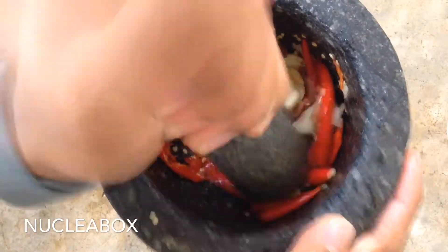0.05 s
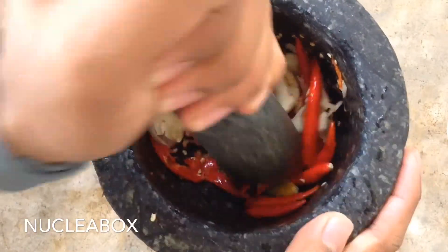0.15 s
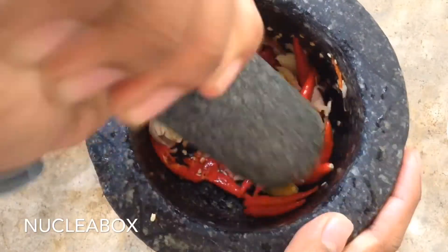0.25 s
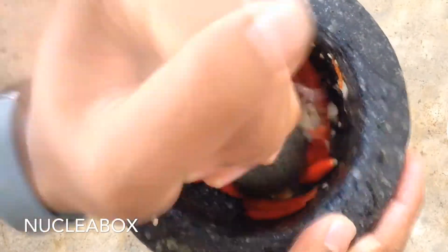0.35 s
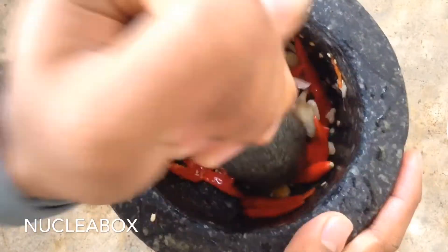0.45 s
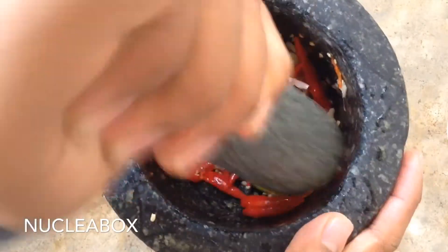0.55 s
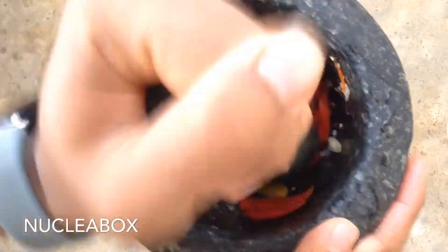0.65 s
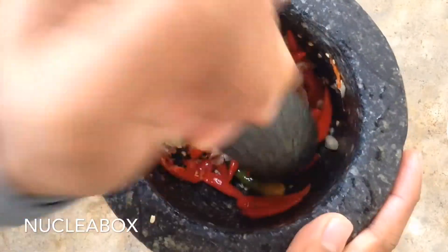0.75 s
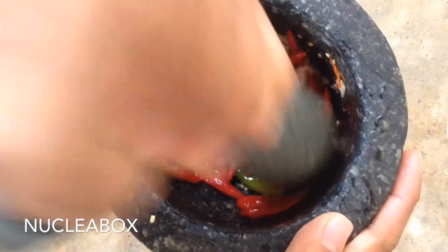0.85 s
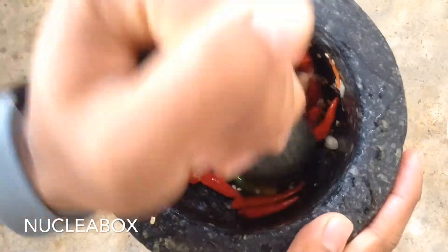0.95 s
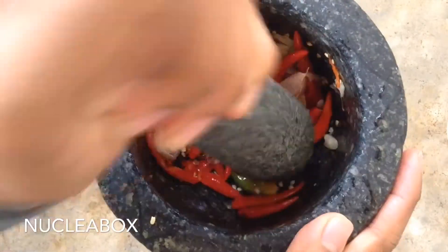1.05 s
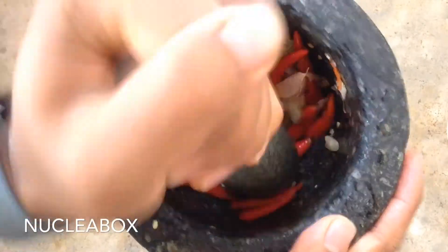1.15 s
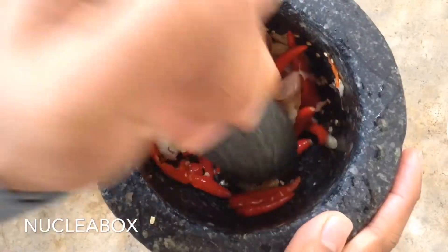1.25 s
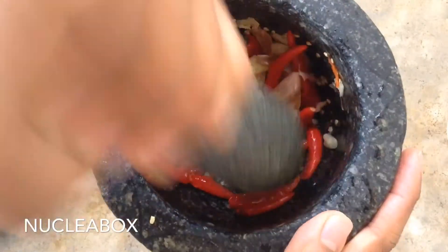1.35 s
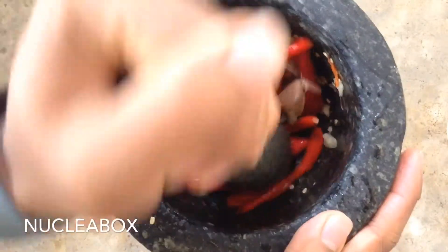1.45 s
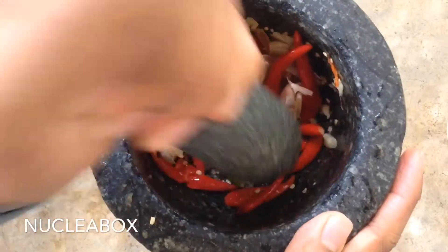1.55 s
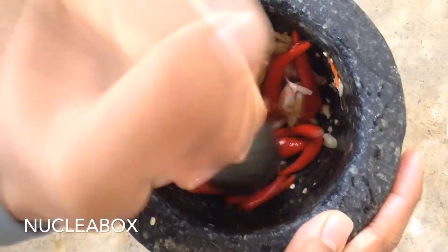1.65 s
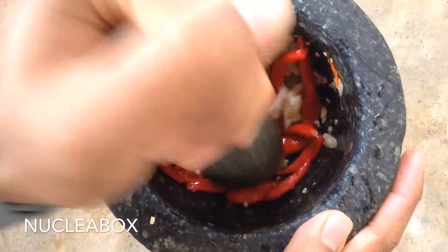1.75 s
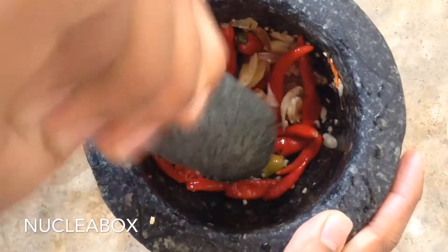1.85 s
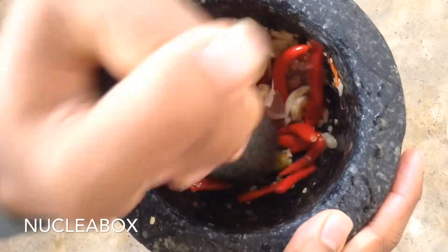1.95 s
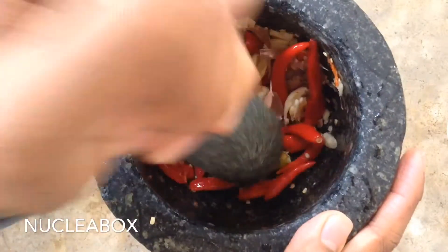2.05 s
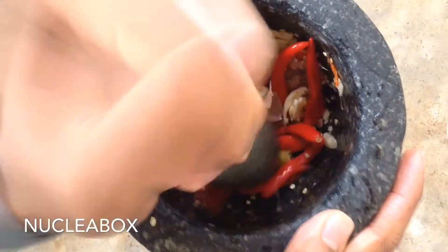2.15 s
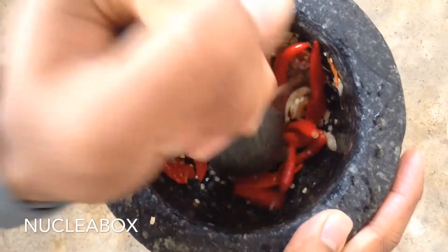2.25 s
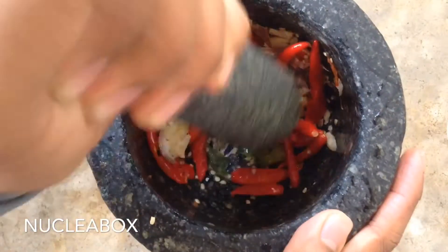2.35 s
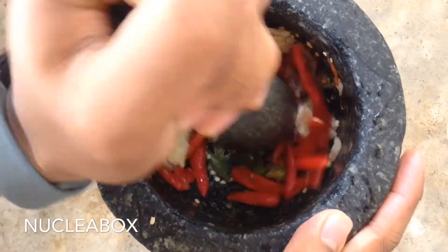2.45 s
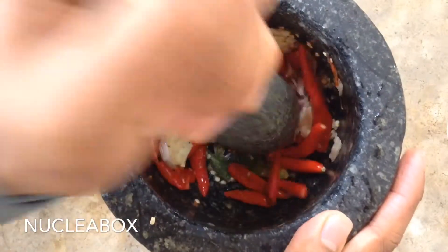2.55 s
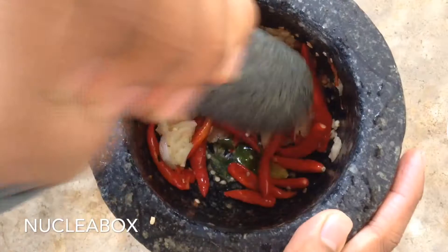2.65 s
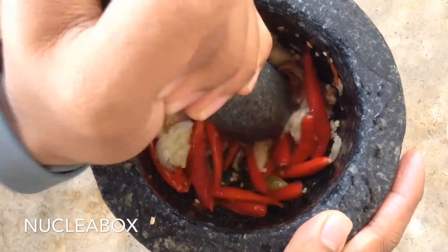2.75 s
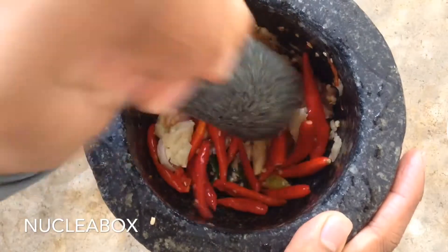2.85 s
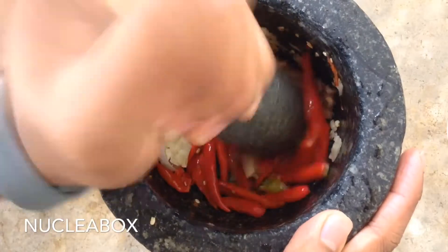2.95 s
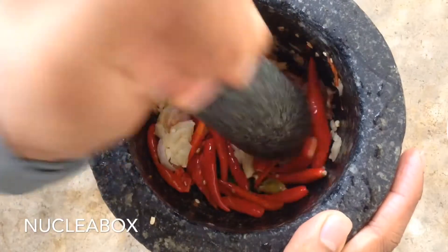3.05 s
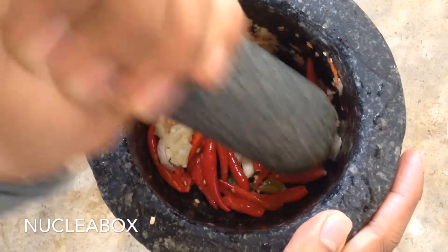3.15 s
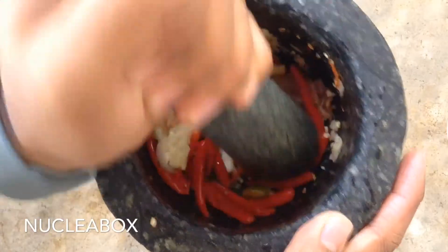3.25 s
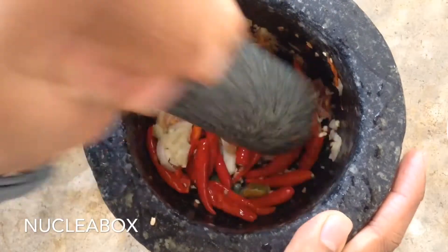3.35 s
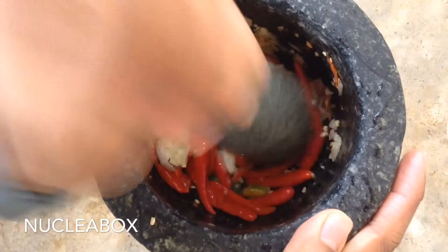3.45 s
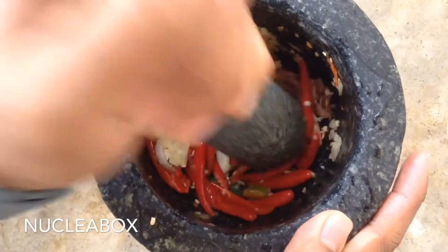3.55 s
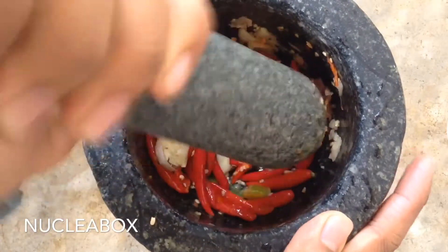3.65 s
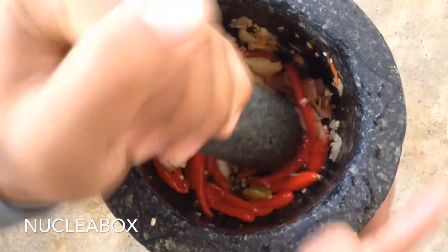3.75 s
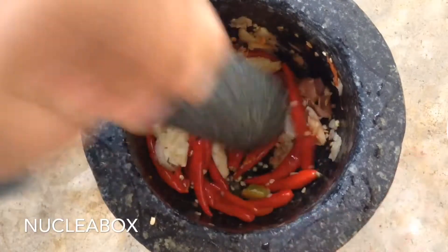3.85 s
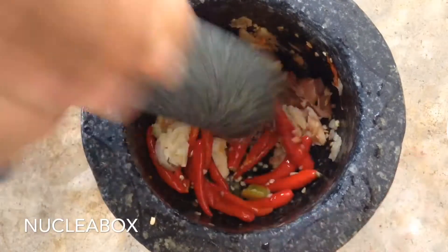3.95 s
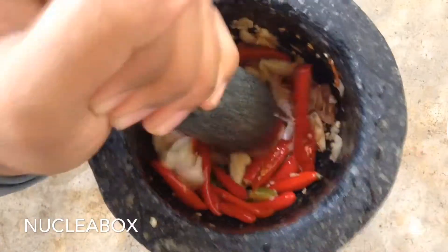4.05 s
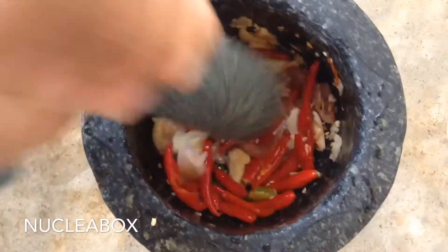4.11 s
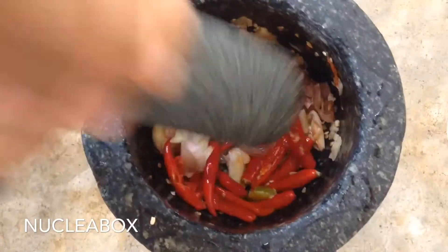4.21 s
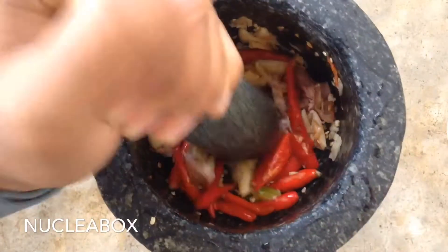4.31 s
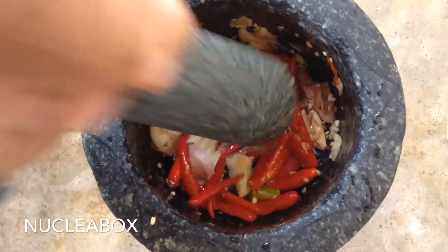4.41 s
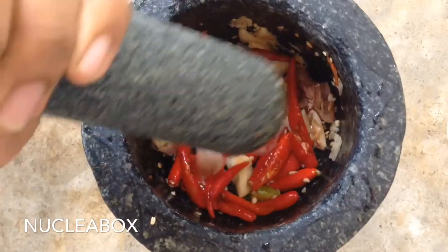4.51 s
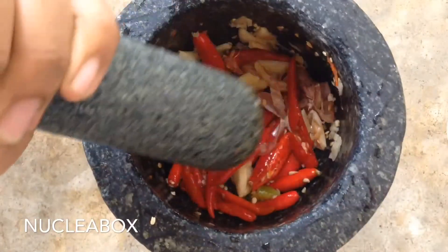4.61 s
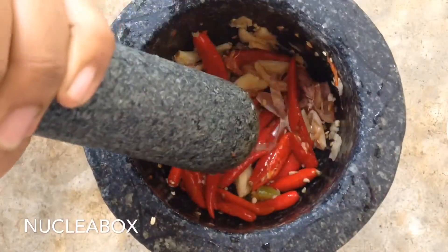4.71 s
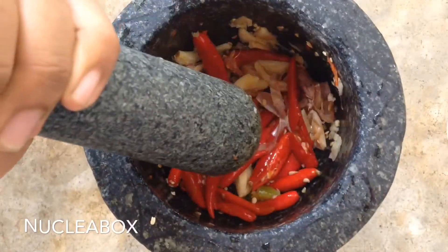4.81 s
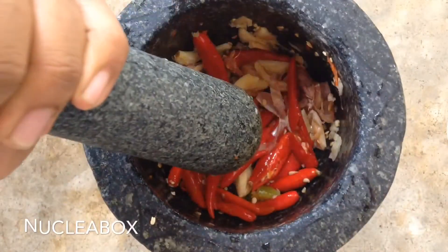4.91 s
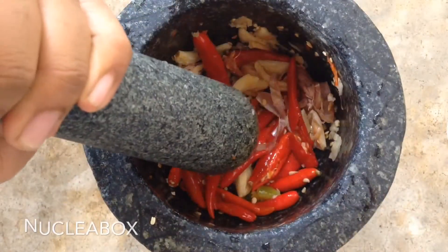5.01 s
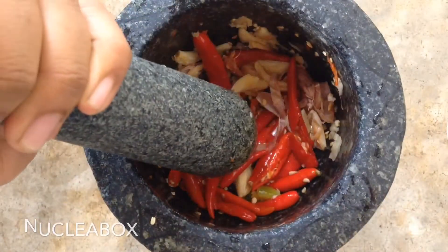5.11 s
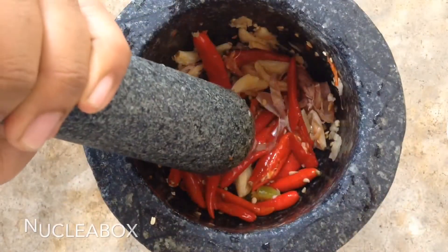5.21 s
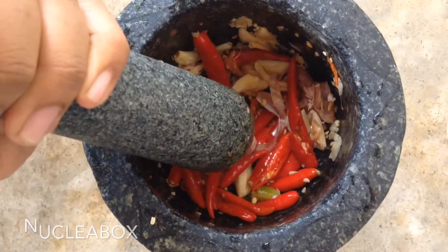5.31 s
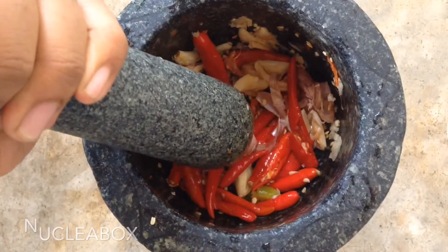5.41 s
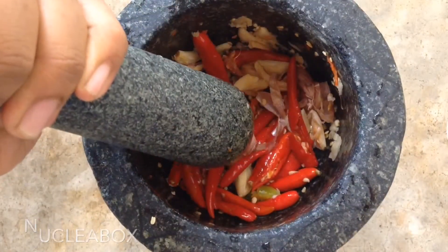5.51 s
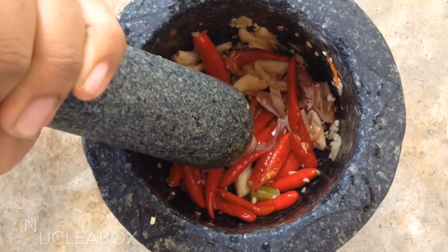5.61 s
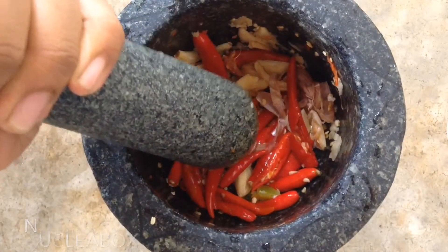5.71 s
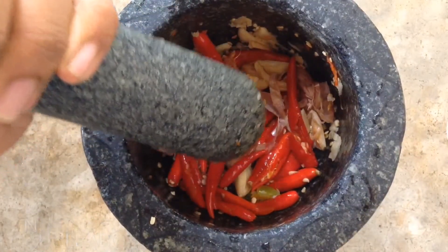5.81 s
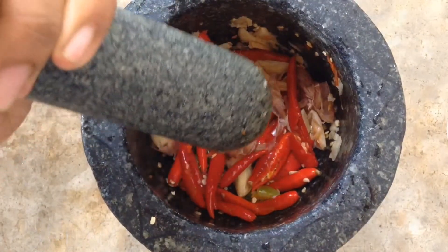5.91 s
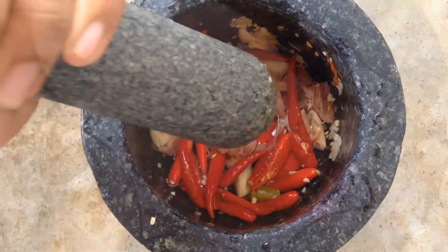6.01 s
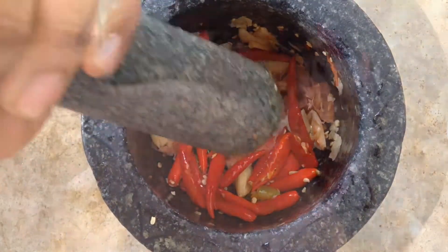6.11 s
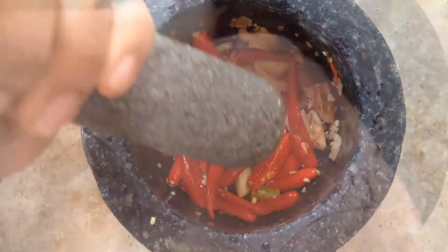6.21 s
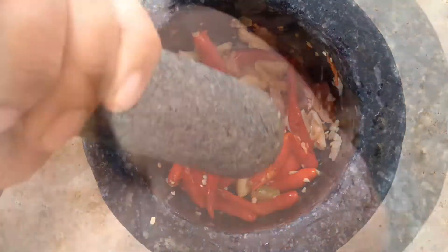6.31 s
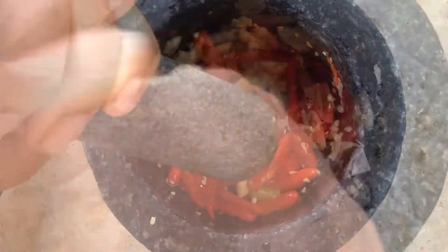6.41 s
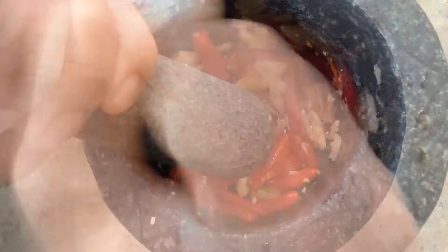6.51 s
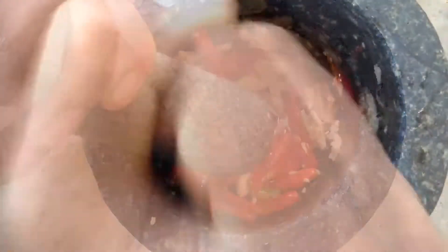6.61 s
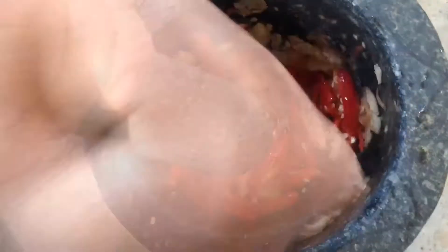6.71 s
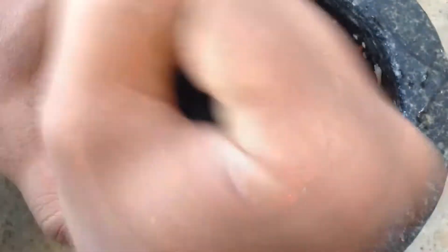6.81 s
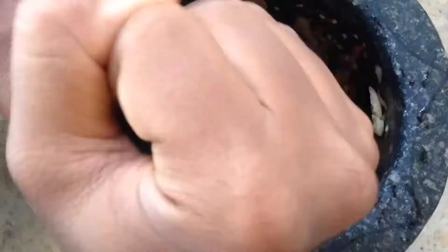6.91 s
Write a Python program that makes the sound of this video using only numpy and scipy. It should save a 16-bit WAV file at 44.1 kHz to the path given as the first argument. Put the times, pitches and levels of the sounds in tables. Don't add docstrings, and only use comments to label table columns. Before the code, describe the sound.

Close, quick stone pounding with crisp bursting skins, low floor thumps and a few bare stone clanks stops abruptly, leaving quiet distant rumble.

```python
import sys
import numpy as np
from scipy import signal
from scipy.fft import rfft, irfft
from scipy.io import wavfile
from scipy.ndimage import uniform_filter1d

SR = 44100
rng = np.random.default_rng(int(sys.argv[2]) if len(sys.argv) > 2 else 0)


def unload_wav(signal):
    wavfile.write(
        sys.argv[1],
        SR,
        np.round(np.clip(np.atleast_2d(signal).T, -1, 1) * 32767).astype(np.int16),
    )


def invert_db(x):
    u = np.asarray(x, float) / 20
    return 10 ** u


N = 307192
SPAN = 4096
BINS = np.fft.rfftfreq(SPAN, 1 / SR) + 1
PRE = 200


def evened(x):
    return x / np.sqrt(np.mean(x ** 2) + 1e-20)


def read(points, hz):
    f, value = np.transpose(points)
    return np.interp(np.log(hz + 1), np.log(f + 1), value)


def add(mix, s, sound):
    part = mix[..., round(s * SR):][..., :sound.shape[-1]]
    part += sound[..., :part.shape[-1]]


def ring(hz, db, t60, phase, rise=0.0022, size=16000):
    pole = np.atleast_1d(2j * np.pi * hz - np.log(1000) / t60)[:, None] / SR
    turn = 2j * np.pi * np.reshape(phase, (-1, 1))
    coarse = invert_db(np.atleast_1d(db))[:, None] * np.exp(pole * np.arange(0, size, 50) + turn)
    fine = np.exp(pole * np.arange(50))
    modes = (coarse.T @ fine).imag.ravel()
    return modes * (1 - np.exp(-np.arange(size) / SR / rise)) ** 2


def click(colour_db, like):
    pulse = np.fft.fftshift(irfft(invert_db(colour_db)))[SPAN // 2 - PRE:]
    return pulse * np.linalg.norm(like) / np.linalg.norm(pulse)


def flutter(size, width, depth):
    wobble = rng.standard_normal(size)
    for _ in range(2):
        wobble = uniform_filter1d(wobble, width)
    return (1 + depth * evened(wobble)) / np.sqrt(1 + depth ** 2)


# (time [s], level [dB])
PASSING = [
    (0, -52.5),
    (1, -60),
    (3.5, -57),
    (4.6, -62),
    (5.201, -59),
    (5.8, -56),
    (6.15, -57.5),
    (6.97, -57),
]


def passing_db(t):
    s, db = np.transpose(PASSING)
    return np.interp(t, s, db)


# (frequency [Hz], density [dB per Hz])
AIR = [(18, -90), (30, -59), (75, -37), (103, -17), (189, -2), (415, -17), (554, -16.5), (702, -17),
       (866, -11.5), (1460, -19.5), (1720, -22), (2540, -22.5), (4780, -38.5), (14800, -48.5), (16000, -66)]


def traffic():
    frames, hz = N // 256 + 5, np.fft.rfftfreq(1024, 1 / SR)
    a, b, patches = rng.standard_normal((3, len(hz), frames))
    patches = uniform_filter1d(patches, size=6, axis=0)
    patches = evened(uniform_filter1d(patches, size=14, axis=1))
    z = (a + 1j * b) * invert_db(read(AIR, hz)[:, None] + 2.2 * patches)
    high = 1 / (1 + (500 / (hz + 1)) ** 8)[:, None]
    rumble = evened(signal.istft(z * (1 - high), nperseg=1024, noverlap=768)[1][:N])
    hiss = evened(signal.istft(z * high, nperseg=1024, noverlap=768)[1][:N])
    rumble_db = 1
    return (rumble * invert_db(rumble_db) + hiss) * invert_db(passing_db(np.arange(N) / SR))


# (frequency [Hz], level [dB])
HUM = [(188.4, -60), (559.9, -71.5), (850.6, -70), (1082, -71), (1130, -72.5), (1351, -74.5), (1453, -72.5),
       (2288, -81.5), (2573, -80.5), (2789, -79)]


def house_hum():
    out = np.zeros(N)
    t = np.arange(N) / SR
    at = np.linspace(0, t[-1], 60)
    for line_hz, db in HUM:
        wander, waver = rng.standard_normal((2, 60))
        turns = np.cumsum(line_hz * (1 + 0.0036 * np.interp(t, at, wander))) / SR
        level = invert_db(db + 1.9 * waver + passing_db(at) + 59)
        out += np.interp(t, at, level) * np.sin(2 * np.pi * turns)
    return out


# (frequency [Hz], density [dB per Hz])
PULP = [(500, -42), (1200, -16), (2000, -5), (3500, 0), (6000, -3), (9000, -5), (13000, -9.5),
        (15300, -12.5), (16500, -39)]


def crush(rows, linger_db=-22):
    out = np.zeros((2, N))
    t_ms = (np.arange(SPAN) - SPAN // 2) / SR * 1000
    pulp_db = read(PULP, BINS)
    sent_gain = invert_db(linger_db + 1)
    for s, db, rise_ms, fall_ms, peak_hz in rows:
        noise, grit = rng.standard_normal((2, SPAN))
        gritty = noise * invert_db(3.6 * evened(uniform_filter1d(grit, size=12)))
        colour_db = pulp_db + 6 * np.exp(-(np.log2(BINS / peak_hz) / .4) ** 2)
        away = np.where(t_ms < 0, -t_ms / rise_ms, t_ms / fall_ms)
        crack = invert_db(-12 * away)
        squash = invert_db(-22 - np.where(t_ms < 0, 6.5, 1.6) * away) * np.where(t_ms < 0, .25, 1)
        shape = crack + squash
        burst = irfft(rfft(gritty * shape * signal.windows.tukey(SPAN, .5)) * invert_db(colour_db))
        burst *= invert_db(db) * np.linalg.norm(shape) / np.linalg.norm(burst)
        start = s - SPAN / 2 / SR
        add(out[0], start, burst)
        snap_db = 5.5 - 2.2 * (rise_ms + fall_ms)
        add(out[0], s - PRE / SR, invert_db(snap_db) * click(colour_db, burst))
        add(out[1], s, sent_gain * click(.55 * colour_db + 0.41 * pulp_db, burst))
        add(out[1], start, sent_gain * burst)
    return out


# (time [s], peak [dB], fall by 12 dB [ms])
TOUCHES = [(0.058, -49, 31.5), (0.3603, -32, 33), (0.9132, -34.5, 10.5), (2.185, -36.5, 15.5),
           (2.423, -53.5, 34.5), (2.711, -39.5, 20), (2.7222, -28, 20.5), (3.225, -38.5, 29.5),
           (3.477, -37.5, 36.5), (4.0064, -40, 28), (4.3, -33, 15)]


def touches():
    rise_ms, bright_hz = 1.7, 5200
    return crush([(s, db, rise_ms, fall_ms, bright_hz) for s, db, fall_ms in TOUCHES], linger_db=-23.5)


# (frequency [Hz], t60 [s])
ECHO = [(150, 0.59), (500, 0.51), (1500, 0.36), (4000, 0.43), (9000, 0.34), (15000, 0.39)]
# (frequency [Hz], level [dB])
ECHO_TONE = [(150, 4), (1000, 0.), (2000, -1.5), (5000, -3.5), (9000, -3), (15000, -5)]


def room(x):
    size = (3, SR // 2)
    taps = rng.choice([-1., 1.], size) * (rng.random(size) < .12)
    hz, t, z = signal.stft(taps, SR, nperseg=256)
    decay_db = read(ECHO_TONE, hz)[:, None] - 60 * t / read(ECHO, hz)[:, None]
    tails = signal.istft(z * invert_db(decay_db), SR, nperseg=256)[1]
    tails *= 1 - np.exp(-np.arange(tails.shape[1]) / SR / 0.0034)
    tails /= np.linalg.norm(tails[0])
    cycle = np.arange(N) / SR * 1.3 + np.arange(3)[:, None] / 3
    turn = np.cos(np.pi * cycle) * np.sqrt(2 / 3)
    return signal.oaconvolve(x * turn, tails, axes=1)[:, :N].sum(0)


# (time [s], peak [dB], fall by 12 dB [ms], brightest [Hz])
SQUASHES = [(0.0733, -32, 8, 2900), (0.3806, -15, 5.5, 9230), (0.3925, -21.5, 7, 2970),
            (0.6576, -22, 7.5, 3900), (.67, -25, 18, 8210), (0.6788, -19.5, 7, 10030),
            (0.6966, -32.5, 9.5, 7874), (1.4424, -21.5, 4.5, 7400), (2.4581, -24.5, 6.5, 7800),
            (2.481, -29.5, 4, 2396), (2.7589, -24, 11.5, 3700), (2.9968, -24, 4.5, 9000),
            (3.5503, -39, 1, 9200), (4.0198, -21, 6.5, 3210), (4.032, -24, 9.5, 3410),
            (4.0818, -43.5, 5, 2770), (4.125, -57.5, 42, 9000), (4.175, -58, 44, 9000)]


def squashes():
    return crush([(s, db, 0.42 * fall_ms, fall_ms, hz) for s, db, fall_ms, hz in SQUASHES])


# (time [s], peak [dB], rise to 12 dB [ms], fall by 12 dB [ms], brightest [Hz])
CRACKS = [(0.085, -10, 3.5, 4.5, 5700), (.9165, -21.5, 2.2, 4.5, 12000), (0.9216, -11, 1.5, 2.5, 7000),
          (1.1709, -16.5, 1.8, 6, 6580), (1.4294, -14, 1.8, 2, 4760), (1.6869, -9, 1.3, 1.5, 3500),
          (1.9472, -11, 2.5, 6, 7400), (2.1926, -10, 0.7, 1.46, 2500), (2.4443, -27, 2.5, 15, 11570),
          (2.7311, -18.5, 7.5, 5.5, 3340), (2.9714, -23.5, 0.2, 5.5, 8140), (2.986, -17, 6, 4, 8900),
          (3.2407, -11, 3.5, 2, 6370), (3.5021, -5.5, 2.5, 1.5, 4500), (3.7659, -7, 2.5, 1.5, 4030),
          (4.309, -12.5, 1.5, 3.5, 5640)]


def cracks():
    return crush(CRACKS)


# (frequency [Hz], level [dB], t60 [s])
MORTAR = [(338, -1.5, .06), (448, 1, 0.058), (504, 2.5, 0.035), (628, 6, 0.011), (743, 2.5, 0.056),
          (892, -1.5, 0.054), (1074, -4.5, .035), (1196, -4, 0.054), (1460, -6.5, .03)]
# (frequency [Hz], level [dB], t60 [s])
SLAB = [(104, -15, .3), (152, -13.5, 0.083), (203.7, 2, .21), (283.4, -8, .28), (326.5, -14, .2)]


def land(rows, echo_db, damping):
    out = np.zeros((2, N))
    hz, db, t60 = np.transpose(MORTAR)
    low_hz, low_db, low_t60 = np.transpose(SLAB)
    for s, knock_db, centre_hz, thump_db in rows:
        u, v, w = rng.random((3, len(hz)))
        near_db = -9 * np.log2(hz / centre_hz) ** 2 + 8.9 * v
        body = ring(hz * (1 + 0.11 * (u - .5)), db + near_db, t60 / damping, .1 * w, rise=0.0013, size=4000)
        slap = ring(300 + .6 * centre_hz, 11, 0.013, 0, rise=0.0008, size=4000)
        knock = body + slap
        knock *= invert_db(knock_db) / abs(knock).max()
        add(out[0], s + .0014, knock)
        echo_colour_db = -6.5 * np.log2(BINS / (0.78 * centre_hz)) ** 2
        add(out[1], s, invert_db(echo_db - 4) * click(echo_colour_db, knock))

        u, v, w = rng.random((3, len(low_hz)))
        thump_hz = low_hz * (1 + 0.043 * (u - .5))
        thump = ring(thump_hz, low_db + 3.4 * v, low_t60, w, rise=0.0038, size=12000)
        add(out[1], s, invert_db(thump_db - 13) * thump[:1500])
        add(out[0], s, invert_db(thump_db - 1) * thump * flutter(len(thump), width=350, depth=.25))
    return out


# (time [s], knock [dB], knock centre [Hz], thump [dB])
BLOWS = [(0.09, -21.5, 675, -34), (.388, -26, 500, -30.5), (0.618, -15, 577, -42.5),
         (.705, -1.5, 734, -22.5), (.914, -9, 695, -31.5), (1.169, -23.5, 730, -30),
         (1.426, -28, 496, -39.5), (1.688, -24, 697, -24.5), (1.947, -12.5, 468, -18.5),
         (2.191, -3, 897, -21.5), (2.736, -16, 700, -35), (2.985, -25.5, 401, -23.5),
         (3.235, -29.5, 726, -48), (3.501, -23, 716, -20), (3.763, -19, 800, -29), (4.02, -28, 785, -51),
         (4.311, -13.5, 428, -24.5)]


def blows():
    return land(BLOWS, echo_db=-6.5, damping=1.2)


# (time [s], knock [dB], knock centre [Hz])
ROCKS = [(0.124, -16, 463), (.149, -18.5, 743), (.171, -18.5, 471), (.436, -14.5, 460), (0.461, -21, 468),
         (0.657, -10, 727), (0.674, -9, 649), (1.223, -24, 729), (1.479, -20.5, 428), (2.198, -7, 600),
         (3.304, -21.5, 468), (3.814, -28.5, 463), (4.049, -12, 474), (4.109, -18, 471),
         (4.143, -18.5, 468), (4.186, -23.5, 452), (4.216, -25.5, 471)]


def rocks():
    return land([(s, db, hz, -30.5 + 0.4 * db) for s, db, hz in ROCKS], echo_db=-7.5, damping=1.6)


# (frequency [Hz], level [dB], t60 in the hand [s], t60 free [s])
PESTLE = [(1525, -8.5, 0.027, .2), (1880, 3.5, 0.019, .22), (2500, -3.5, 0.012, 0.17),
          (2900, -7.5, 0.057, 0.22), (3170, -2.5, .05, .48), (4130, -16, .012, .2), (5400, -17, .012, .2),
          (7400, -25, 0.083, .35), (12000, -33, .05, .2)]
# (time [s], level [dB], long ring share [dB], tilt [dB per octave], damping [factor],
# echo [dB])
CLANKS = [
    (0.6187, -6, -31, -3.5, 0.92, -20),
    (0.9153, -4, -14.5, -4, 0.99, -20),
    (2.192, -2.5, -33, 1, 2.6, -8.5),
]


def clanks():
    out = np.zeros((2, N))
    hz, db, held_t60, free_t60 = np.transpose(PESTLE)
    for s, blow_db, free_db, tilt_db, damping, echo_db in CLANKS:
        phases = rng.random((5, len(hz)))
        tone_db = blow_db + db + tilt_db * np.log2(hz / hz[1])
        sound = ring(hz, tone_db, held_t60 / damping, .2 * phases[0], rise=0.00039)
        add(out[1], s + .009, invert_db(echo_db) * click(-7 * np.log2(BINS / 1500) ** 2, sound))
        add(out[1], s, invert_db(free_db + 4) * sound)
        tick = click(-6 * np.log2(BINS / 2000) ** 2, sound)
        add(out[0], s - PRE / SR, invert_db(-19.5) * tick)
        rough = flutter(len(sound), width=200, depth=.35)
        long_db = tone_db + 34 * np.log10(free_t60 / free_t60.max()) + free_db - 2.5
        for split, phase in zip((.972, .9893, 1.0003, 1.0047, 1.019), phases):
            off = abs(split - 1)
            t60 = free_t60 / damping / (1 + 40 * off)
            sound = sound + rough * ring(hz * split, long_db - 220 * off, t60, phase, rise=.004)
        add(out[0], s, sound)
    return out


# (time [s], frequency [Hz], level [dB], t60 [s])
FAR_RINGS = [
    (1.99, 1480, -55, 1.5),
    (2.02, 1530, -59, 1.1),
    (2.3, 400, -47, 1.8),
    (4.34, 398, -48, 1.8),
]


def far_rings():
    out = np.zeros(N)
    fade = signal.windows.tukey(SR, .3)[SR // 2:]
    for s, hz, db, t60 in FAR_RINGS:
        add(out, s, ring(hz, db, t60, 0, rise=0.024, size=SR // 2) * fade)
    return out


# (time [s], peak [dB], brightest [Hz])
CRUMBS = [(2.5391, -46, 3790), (2.558, -51.5, 9000), (2.8459, -51, 3100), (3.0584, -44.5, 3295),
          (3.1558, -55, 4800), (3.353, -48.5, 12000), (3.633, -50.5, 8000), (3.656, -49, 7000),
          (3.7101, -41, 8000), (4.4548, -50.5, 5280)]


def crumbs():
    rise_ms, fall_ms = 1.8, 1.3
    return crush([(s, db, rise_ms, fall_ms, hz) for s, db, hz in CRUMBS])


def scene():
    direct, sent = touches() + squashes() + cracks() + blows() + rocks() + clanks() + crumbs()
    background = traffic() + house_hum()
    fade_from_s, fade_to_s = 6.16, 6.946
    fade = np.clip((fade_to_s - np.arange(N) / SR) / (fade_to_s - fade_from_s), 0, 1)
    return (fade * (direct + far_rings() + room(sent) + background))[None]


def top_cut(x):
    return signal.sosfilt(signal.butter(12, 16450, fs=SR, output="sos"), x)


def record(dry):
    thin = signal.sosfilt(signal.butter(N=2, Wn=95, btype="high", fs=SR, output="sos"), dry)
    edge = signal.firwin(191, 15600, window=("kaiser", 8), fs=SR)
    limited = signal.oaconvolve(np.clip(thin, -1, 1), edge[None], "same")
    finished = np.clip(limited, -.97, .97)
    return top_cut(finished)


dry = scene()
out = record(dry)
unload_wav(out)
```